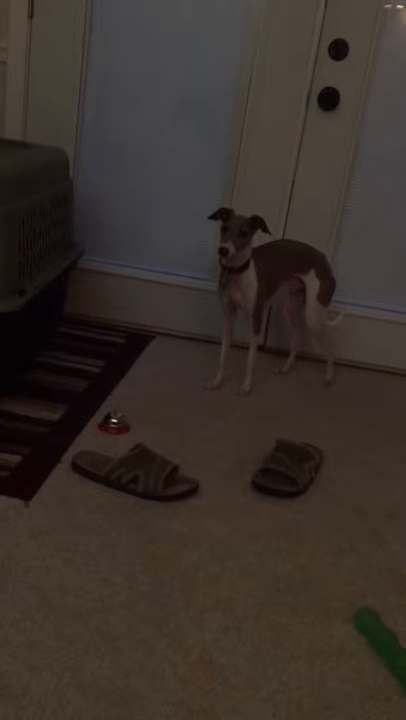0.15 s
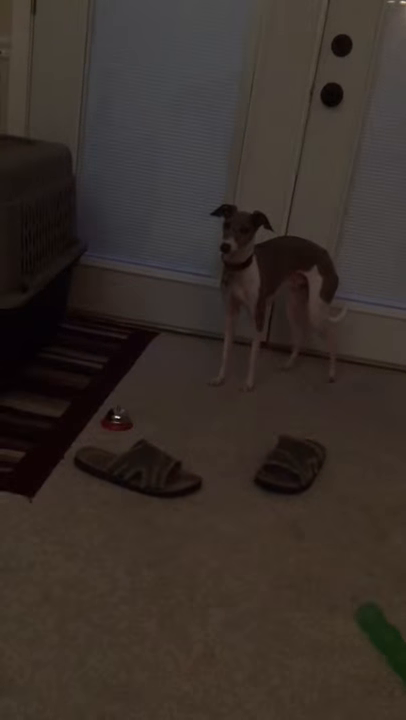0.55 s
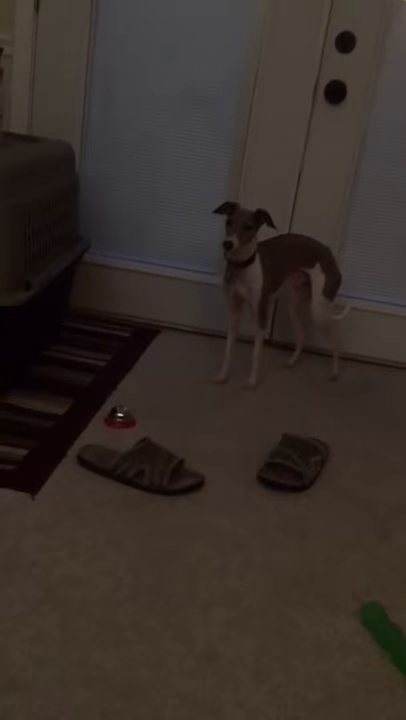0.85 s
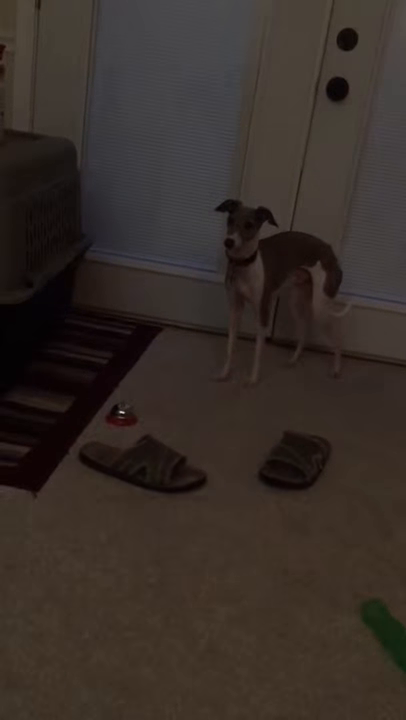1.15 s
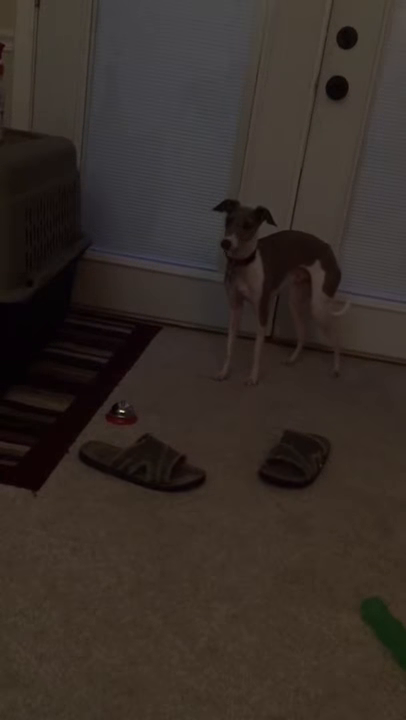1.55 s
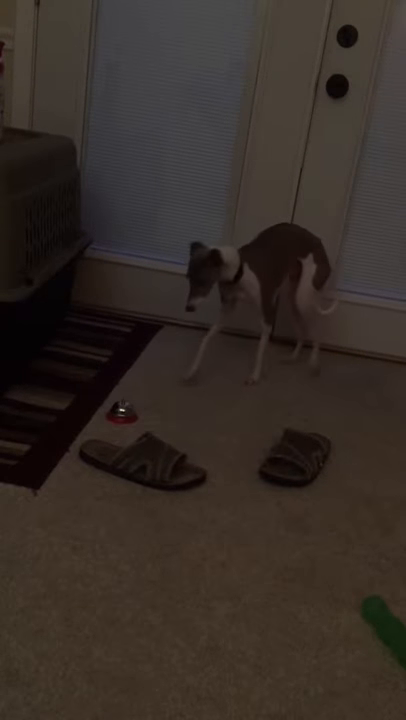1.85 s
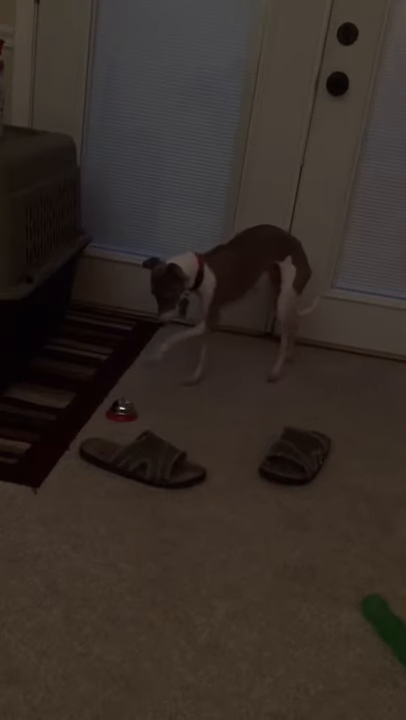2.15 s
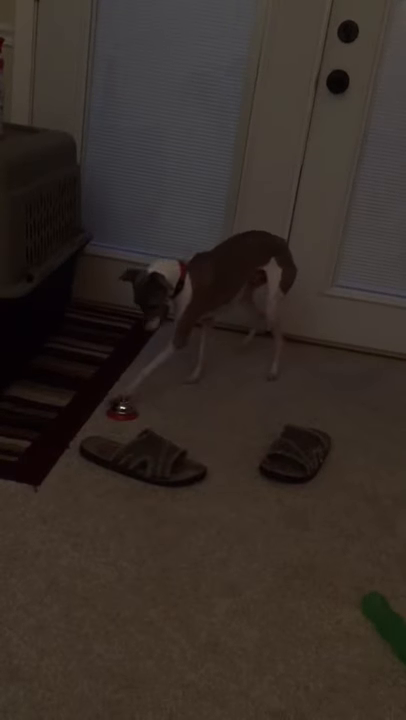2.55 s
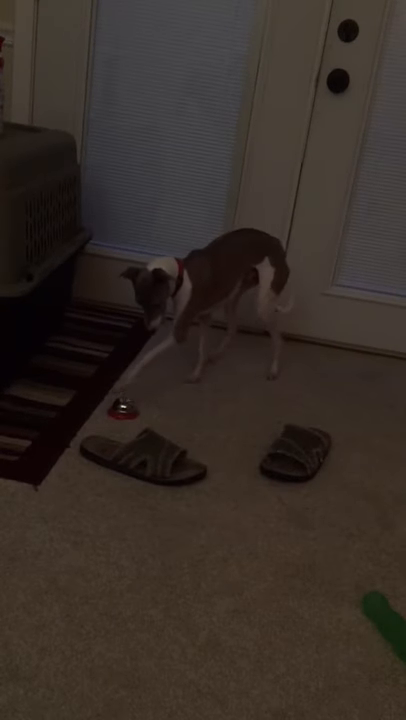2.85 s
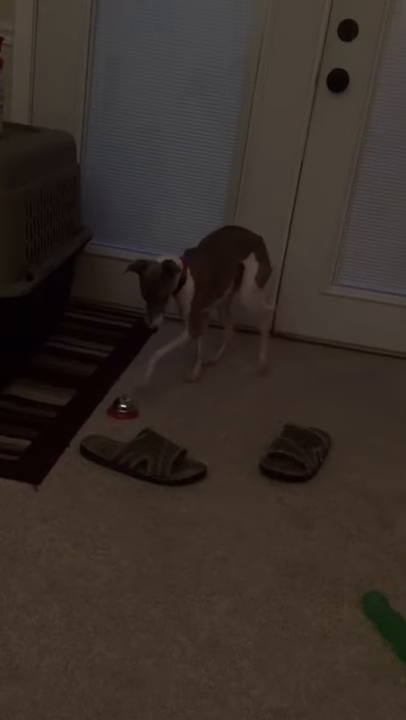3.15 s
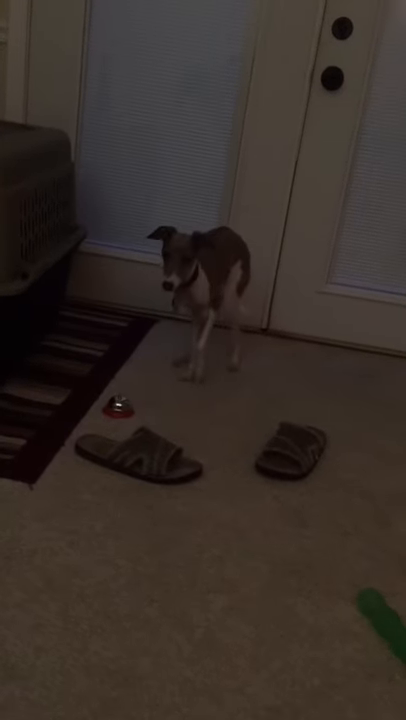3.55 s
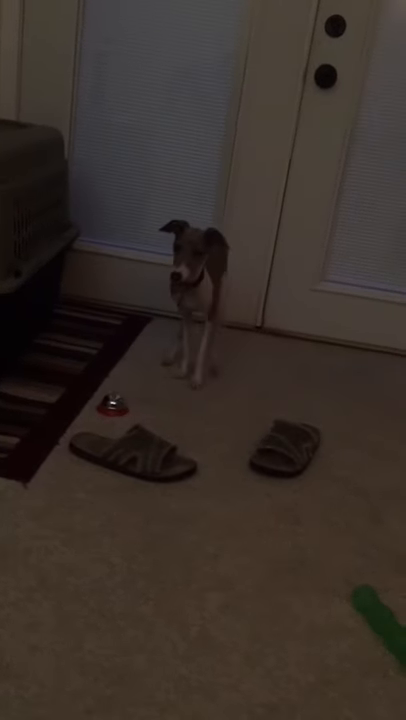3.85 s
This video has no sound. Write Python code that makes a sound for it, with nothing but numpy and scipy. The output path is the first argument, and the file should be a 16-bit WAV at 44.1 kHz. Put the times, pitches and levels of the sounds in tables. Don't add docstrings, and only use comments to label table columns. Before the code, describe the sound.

Quiet hum and a couple of low microphone bumps, faint collar clinks, then a claw hits a metal desk bell and its clapper strikes once, the ring softened by the paw; dry indoor room.

```python
import sys
import numpy as np
from scipy import signal
from scipy.fft import rfft, irfft
from scipy.io import wavfile
from scipy.ndimage import uniform_filter1d

SR = 44100
rng = np.random.default_rng(int(sys.argv[2]) if len(sys.argv) > 2 else 0)


def put_to_file(sound):
    columns = np.atleast_2d(sound).T
    safe = np.clip(columns, -1, 1)
    whole_steps = np.round(safe * 32767)
    wavfile.write(sys.argv[1], SR, whole_steps.astype(np.int16))


def volts_from_decibels(level):
    exponent = np.asarray(level, float) / 20
    return 10 ** exponent


N = 176400

# (frequency [Hz], density [dB per Hz])
RUMBLE_SPECTRUM = [(12, -41), (20, -14), (42, 0.5), (123, -3), (172, -9), (252, -5.5), (286, -10),
                   (687, -27), (900, -26), (1170, -26.5), (1980, -120)]
HISS_SPECTRUM = [(350, -2.5), (600, -1), (2490, -4.5), (2830, -7), (3410, -7), (4930, -7), (12800, -16),
                 (16500, -17.5), (18000, -29)]
RUMBLE_DB, HISS_DB = -64.5, -71.7
RUMBLE_PATCHY_DB, HISS_PATCHY_DB = 1.5, 0.67
DIP_HZ, DIP_WIDTH_HZ, DIP_DB = 10500, 270, -6.5
# (frequency [Hz], width [Hz], level [dB])
HUM_LINES = [(80.6, 5.1, -72.5), (119.85, 11, -73), (1182, 8.8, -87.5), (313.5, 14, -84.5),
             (250, 26, -80.5)]
# (pitch [Hz], first chirp [s], period [s], length [s], level [dB])
CRICKETS = [(5190, 0.0, 1.056, 0.2, -83), (4490, 0.02, 1.594, 0.25, -81), (4810, 0.52, 0.532, 0.22, -85),
            (6090, 0.27, .349, 0.14, -84.5)]
CHIRP_PULSES_PER_S, CHIRP_WIDTH_HZ = 56, 87
TRILL_HZ, TRILL_WIDTH_HZ, TRILL_DB, TRILL_SWING_DB = 2883, 126, -86.5, 3
# (time [s], level [dB], pitch [Hz], t60 [s])
BUMPS = [
    (0.637, -51.5, 103, 0.06),
    (0.668, -66, 100, 0.053),
    (0.808, -40, 91, 0.046),
    (3.736, -53, 95, 0.049),
    (3.761, -52, 88, 0.057),
]
BUMP_SAG, BUMP_SAG_S = 2.2, 0.0015
TICK_TIMES_S = [.806, 1.748, 2.744, 2.7496, 3.190, 2.744, 3.528, 3.538, 2.513, 3.926, 3.931, 3.945, 3.878,
                2.545, 3.0312]
# (level [dB], centre [Hz], width [Hz], length [s])
TICK_BANDS = [(-59, 270, 250, 0.018), (-74, 14000, 3000, .04), (-39, 7700, 700, 0.0084),
              (-25.5, 13800, 4600, 0.0018), (-46.5, 5850, 1600, 0.011), (-51, 11300, 1500, 0.0054),
              (-64, 6400, 19000, 0.033), (-57, 880, 3400, 0.02), (-50.5, 4800, 750, 0.008),
              (-51, 4170, 380, 0.0039), (-56, 12800, 4000, 0.0036), (-74, 13800, 2000, 0.034),
              (-67, 15500, 4000, .004), (-42.5, 14900, 740, .008), (-32.5, 15200, 1000, .007)]
# (frequency [Hz], density [dB per Hz])
CRACK_SPECTRUM = [(700, -38), (1500, -5), (3000, -12.5), (5000, -8.5), (8000, 2.5), (12000, -0.5),
                  (16000, -8), (17800, -7)]
CRACK_T60_S = 0.022
# (frequency [Hz], level [dB], t60 [s])
LONG_TAG = [(3750, -13, .03), (4050, -13, .03), (4818, -9, .04), (6900, -11, .04), (9421, -2, .08),
            (9500, -5, .08), (9290, -6, .03), (12670, -8, .04), (13260, -6, .03), (13910, -9, .04),
            (14920, -10, .04)]
BRIGHT_RING = [(5140, -12, .015), (5700, -21, .02), (10770, -12, .02), (12040, -14, .03), (12840, -11, .06),
               (13280, -1, .012), (13840, -12, .03), (14750, 0, .012), (14900, -5, .02), (15490, -1, .02),
               (16100, -10, .012)]
TAG_PAIR = [(4790, -12, 0.027), (6470, -6.5, .03), (7359, -10, 0.026), (8270, 2, 0.046), (8080, 1.5, 0.035),
            (9960, -17, 0.035), (11220, -5, 0.031), (11900, -5, 0.022), (13430, 0.5, 0.063),
            (13950, -10, .02), (15100, -6, .06), (16870, -17, 0.03), (8460, 1.5, 0.033)]
# (time [s], long tag [dB], bright ring [dB], crack [dB], rise [s])
CLINKS = [(2.499, -57, -41, -56, 0.0013), (2.513, -57, -44, -45.5, .0004), (2.527, -59, -70, -55, 0.0023),
          (2.545, -47.5, -47, -57, 0.00084), (2.599, -52.5, -63, -57, 0.00087),
          (2.61, -59, -66, -68, 0.0028), (2.652, -57, -75, -80, 0.0035), (2.7494, -51, -28.5, -34.5, .0003),
          (2.7552, -42.5, -49, -41.5, 0.0012), (2.898, -60.5, -68, -75, .001),
          (2.904, -54, -78, -82, 0.0027), (3.012, -76, -54, -76, .001), (3.031, -48, -34, -48, 0.00068),
          (3.057, -54.5, -52, -68, .003), (3.188, -59, -54, -48, .0006), (3.215, -68, -50, -70, .004),
          (3.237, -43, -50, -53, 0.0013), (3.252, -45.5, -64, -65, .003), (3.294, -64, -49, -53.5, 0.0011),
          (3.306, -59, -55, -70, .004)]
CLINK_SPREAD_DB = 4.5
# (time [s], level [dB])
SWINGS = [
    (1.753, -73),
    (1.768, -72),
    (1.855, -53),
    (1.861, -53),
    (1.866, -53.5),
    (1.869, -56.5),
    (1.883, -65),
    (1.893, -70),
    (1.908, -73),
    (2.012, -76),
]
SWING_RISE_S, SWING_CRACK_DB = 0.00075, -5
# (frequency [Hz], level [dB], t60 [s])
PLUNGER_MODES = [(3650, -0.5, .02), (3900, -3, 0.015), (4150, 2, 0.015), (5000, -7, 0.011),
                 (5180, -3, 0.023), (5880, -5.5, 0.013), (6300, -4, 0.017)]
# (time [s], length [s], level [dB], tilt [dB per octave])
RATTLES = [
    (2.511, 0.065, -59, 0),
    (2.743, 0.079, -58, 3),
    (3.029, 0.044, -54.5, -4),
    (3.092, 0.055, -60, -3),
    (3.190, 0.026, -53.5, -7),
    (3.296, .05, -65, -5),
    (1.857, .03, -75, 8),
]
RATTLE_PER_S, RATTLE_SPREAD_DB, RATTLE_FADE_DB = 460, 4, -12
DOME_HZ = [1635, 1679, 3808, 4311, 4322, 7865, 7855.5, 9952, 12186, 12125, 17197, 17090, 7774]
# (t60 [s], clawed [dB], clapper [dB], blooming share [below 0: extra that fades early], lost at
# bounce [dB])
DOME_MODES = [(1.36, -29.5, -30.5, -1.2, -0.6), (1.45, -26.5, -26, -1.2, -1.3), (0.25, -53, -18, 0.77, -5),
              (0.78, -37, -16, -0.5, -0.5), (0.76, -39, -27, 0.7, -0.6), (0.34, -14, 7.5, 0.83, 0.2),
              (0.68, -31, -15.5, 1, 0), (0.19, -34, -8, 0.25, -9), (0.31, -9.5, 2.5, 0.16, -13.5),
              (0.25, -24, -26, 0.2, -3), (0.22, -16, -9, 0.63, 0), (.15, -38, -11, .2, -3),
              (0.093, -14, -11, -0.29, -4)]
# (time [s], level [dB], lowest tone free after [s], paw lands again after [s], level change then
# [dB])
CLAWED = [
    (2.745, -29, 0.032, .285, -11),
    (3.021, -46.5, .002, 0.061, 4),
]
# (time [s], level [dB], lowest tone free after [s])
CLAPPER = [
    (3.076, -30, 0.0015),
]
# (time [s], frequency [Hz], level [dB], t60 [s])
GRAZES = [
    (2.733, 4311, -62, .06),
    (2.736, 7865, -56, .05),
]
BLOOM_S, BOUNCE_S, TOUCH_S = 0.035, 0.04, 0.0022
BRUSH_S, BRUSH_DB = 3.292, -7
# (frequency [Hz], level [dB], t60 [s])
BASE_MODES = [(802, -9.5, 0.068), (1126, 2, 0.04), (1910, -1.5, 0.025), (2813, -0.5, 0.022),
              (2280, -7, 0.041)]
RIM_MODES = [(1550, 5, .025), (1346, -5.5, 0.042)]
# (time [s], base [dB], rim [dB])
KNOCKS = [
    (2.531, -56, -51.5),
    (2.76, -48.5, -66),
    (3.02, -58, -51),
    (3.080, -58.5, -65),
    (3.116, -57, -53),
]
# (frequency [Hz], t60 [s])
ROOM_T60 = [(500, 0.17), (2000, 0.22), (6000, 0.24), (12000, 0.22), (17000, 0.15)]
# (frequency [Hz], level [dB])
WALLS = [(1000, 1), (6000, 0), (11000, -3.5), (17000, -1.5)]
ROOM_DB, DOME_ROOM_DB, FIRST_ECHO_S = -1.6, -13, 0.005
LOW_EDGE_HZ, HIGH_EDGE_HZ = 42, 17850


def evened(x):
    return x / np.sqrt(np.mean(x ** 2) + 1e-20)


def read(points, hz):
    f, value = np.transpose(points)
    return np.interp(np.log(hz + 1), np.log(f + 1), value)


def add(mix, s, sound):
    part = mix[round(s * SR):][:len(sound)]
    part += sound[:len(part)]


def band(length_s, hz, width_hz):
    n = round(length_s * SR) + 2000
    f = np.fft.rfftfreq(n, 1 / SR)
    resonance = 1 / (1 + (2 * (f - hz) / width_hz) ** 2)
    noise = irfft(rfft(rng.standard_normal(n)) * resonance, n)
    return evened(noise)[:n - 2000]


def ring(modes, spread_db, free_s=0, bloom=0, rise_s=0, touch_s=9, touch_db=0, brush_s=9):
    hz, db, t60 = np.transpose(modes)[:, :, None]
    t = np.arange(round(min(t60.max(), 1.2) * SR)) / SR
    rise_time = free_s * (hz.min() / hz) ** 2 + rise_s + 0.0001
    rise = (1 - np.exp(-t / rise_time)) * (1 - bloom * np.exp(-t / BLOOM_S))
    hz = hz * (1 + 0.0003 * spread_db * rng.standard_normal(hz.shape))
    db = db + spread_db * rng.standard_normal(hz.shape)
    db = db + touch_db * np.clip((t - touch_s) / TOUCH_S, 0, 1)
    db = db + BRUSH_DB * np.clip(hz / 2000 - 1, 0, 1) * np.clip((t - brush_s) / TOUCH_S, 0, 1)
    return (volts_from_decibels(db - 60 * t / t60) * rise * np.sin(2 * np.pi * hz * t)).sum(0)


def crack():
    n = 4096
    shape = volts_from_decibels(read(CRACK_SPECTRUM, np.fft.rfftfreq(n, 1 / SR)))
    burst = irfft(rfft(rng.standard_normal(n)) * shape, n)
    return evened(burst) * volts_from_decibels(-60 * np.arange(n) / SR / CRACK_T60_S)


def wash(spectrum, db, patchy_db):
    frames, hz = N // 512 + 6, np.fft.rfftfreq(2048, 1 / SR)
    real, imag, patches = rng.standard_normal((frames, 1025, 3)).T
    patches = uniform_filter1d(patches, size=6, axis=0)
    patches = evened(uniform_filter1d(patches, size=5, axis=1))
    inside = (hz >= spectrum[0][0]) & (hz <= spectrum[-1][0])
    dip = DIP_DB * np.exp(-((hz - DIP_HZ) / DIP_WIDTH_HZ) ** 2)
    level = (read(spectrum, hz) + dip)[:, None] + patchy_db * patches
    z = (real + 1j * imag) * volts_from_decibels(level) * inside[:, None]
    return volts_from_decibels(db) * evened(signal.istft(z, nperseg=2048, noverlap=1536)[1][:N])


def hum():
    return sum(volts_from_decibels(db) * band(N / SR, hz, width)[:N] for hz, width, db in HUM_LINES)


def crickets():
    t = np.arange(N) / SR
    throb = volts_from_decibels(TRILL_DB + TRILL_SWING_DB * band(N / SR, 0, 16.0))
    out = throb * band(N / SR, TRILL_HZ, TRILL_WIDTH_HZ)
    pulses = 1 + 0.31 * np.sin(2 * np.pi * CHIRP_PULSES_PER_S * t)
    for hz, first, period, length, db in CRICKETS:
        phase = np.clip((t - first) % period / length, 0, 1)
        gate = np.sin(np.pi * phase) ** 0.11 * (t >= first)
        out += volts_from_decibels(db) * band(N / SR, hz, CHIRP_WIDTH_HZ) * pulses * gate
    return out


def bumps():
    out, t = np.zeros(N), np.arange(6000) / SR
    for s, db, hz, t60 in BUMPS:
        turns = hz * (t + BUMP_SAG * BUMP_SAG_S * (1 - np.exp(-t / BUMP_SAG_S)))
        envelope = volts_from_decibels(db - 60 * (t / t60) ** 1.7) * (1 - np.exp(-t / 0.0005))
        add(out, s, -envelope * np.sin(2 * np.pi * turns))
    return out


def paws():
    out = np.zeros(N)
    for s, (db, hz, width, length) in zip(TICK_TIMES_S, TICK_BANDS):
        x = band(0.077, hz, width)
        t = np.arange(len(x)) / SR / length
        add(out, s, volts_from_decibels(db) * x * np.minimum(t * 8, 1) * volts_from_decibels(-25 * t))
    return out


def tags():
    out = np.zeros(N)
    for s, tag_db, ring_db, crack_db, rise in CLINKS:
        add(out, s, volts_from_decibels(tag_db) * ring(LONG_TAG, CLINK_SPREAD_DB, rise_s=rise))
        add(out, s, volts_from_decibels(ring_db) * ring(BRIGHT_RING, CLINK_SPREAD_DB, rise_s=rise))
        add(out, s, volts_from_decibels(crack_db) * crack())
    for s, db in SWINGS:
        add(out, s, volts_from_decibels(db) * ring(TAG_PAIR, CLINK_SPREAD_DB, rise_s=SWING_RISE_S))
        add(out, s, volts_from_decibels(db + SWING_CRACK_DB) * crack())
    return out


def plunger():
    out = np.zeros(N)
    for s, length, db, tilt_db in RATTLES:
        draw, size = rng.random((2, len(PLUNGER_MODES), 4096))
        u = np.arange(4096) / SR / length
        tap_db = RATTLE_FADE_DB * u - RATTLE_SPREAD_DB * np.log(size + 0.0092)
        taps = (draw < RATTLE_PER_S / SR) * volts_from_decibels(tap_db) * (u < 1)
        for mode, train in zip(PLUNGER_MODES, taps):
            gain = volts_from_decibels(db - 10 + tilt_db * np.log2(mode[0] / 4500))
            add(out, s, gain * signal.fftconvolve(train, ring([mode], 3.4)))
    return out


def bell_dome():
    out = np.zeros(N)
    t60, claw_db, clapper_db, bloom, lost_db = np.transpose(DOME_MODES)
    clawed_modes = np.c_[DOME_HZ, claw_db, t60]
    struck_modes = np.c_[DOME_HZ, clapper_db, t60]
    bloom = np.minimum(bloom, 1)[:, None]
    for s, hz, db, short_t60 in GRAZES:
        add(out, s, ring([(hz, db, short_t60)], 0, rise_s=0.0012))
    for s, db, free, again, damp_db in CLAWED:
        add(out, s, volts_from_decibels(db) * ring(clawed_modes, 0, free, touch_s=again, touch_db=damp_db))
    for s, db, free in CLAPPER:
        strike = ring(struck_modes, 0, free, bloom, 0.0013, BOUNCE_S, lost_db[:, None], BRUSH_S - s)
        add(out, s, volts_from_decibels(db) * strike)
    return out


def bell_knocks():
    out = np.zeros(N)
    for s, db, *_ in CLAWED:
        add(out, s, volts_from_decibels(db - 10.5) * crack())
    for s, db, _ in CLAPPER:
        add(out, s, volts_from_decibels(db - 8.5) * crack())
    for s, db, rim_db in KNOCKS:
        add(out, s, volts_from_decibels(db) * ring(BASE_MODES, 1.7, 0.0044))
        add(out, s, volts_from_decibels(rim_db) * ring(RIM_MODES, 1.15, 0.003))
    return out


def room(x):
    taps, starts = np.zeros(SR // 2), np.arange(0, SR // 2 - 8, 8)
    taps[starts + rng.integers(0, 8, len(starts))] = rng.choice([-1., 1.], len(starts))
    hz, t, z = signal.stft(taps, SR, nperseg=128)
    level = read(WALLS, hz)[:, None] - 60 * t / read(ROOM_T60, hz)[:, None]
    tail = signal.istft(z * volts_from_decibels(level), SR, nperseg=128)[1]
    tail = np.concatenate([np.zeros(round(FIRST_ECHO_S * SR)), tail / np.linalg.norm(tail)])
    return signal.fftconvolve(x, tail)[:N]


def scene():
    rumble = wash(RUMBLE_SPECTRUM, RUMBLE_DB, RUMBLE_PATCHY_DB)
    hiss = wash(HISS_SPECTRUM, HISS_DB, HISS_PATCHY_DB)
    background = rumble + hiss + hum() + crickets()
    near = paws() + tags() + plunger() + bell_knocks()
    dome = bell_dome()
    wet = room(volts_from_decibels(ROOM_DB) * near + volts_from_decibels(DOME_ROOM_DB) * dome)
    return (dome + near + wet + background + bumps())[None]


def low_pass(x):
    return signal.sosfilt(signal.butter(12, 18680, fs=SR, output="sos"), x)


def record(dry):
    low = signal.butter(4, LOW_EDGE_HZ, "high", fs=SR, output="sos")
    high = signal.cheby2(10, 35, HIGH_EDGE_HZ, fs=SR, output="sos")
    mix = signal.sosfilt(np.vstack([low, high]), dry)
    return low_pass(mix)


dry = scene()
out = record(dry)
put_to_file(out)
```